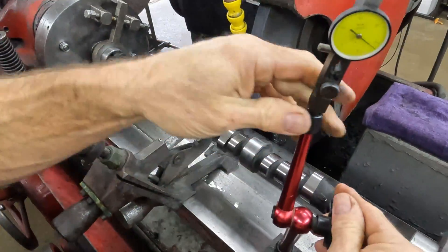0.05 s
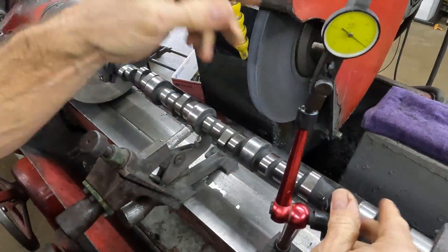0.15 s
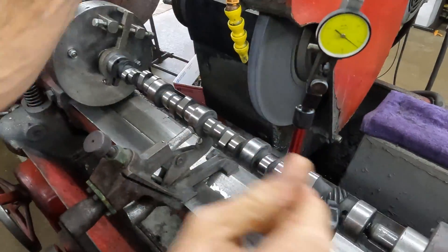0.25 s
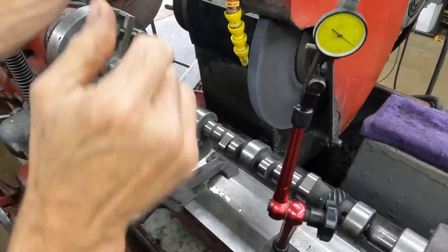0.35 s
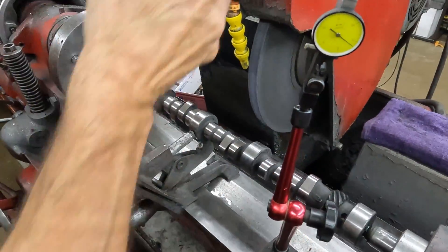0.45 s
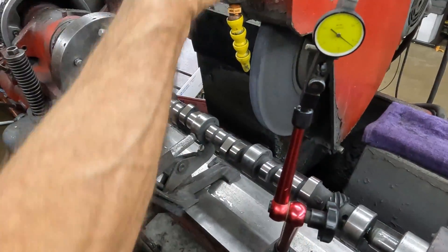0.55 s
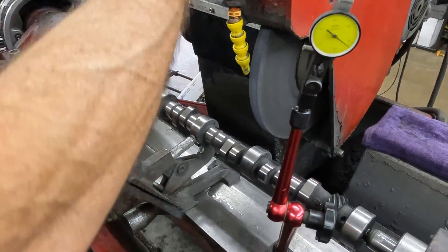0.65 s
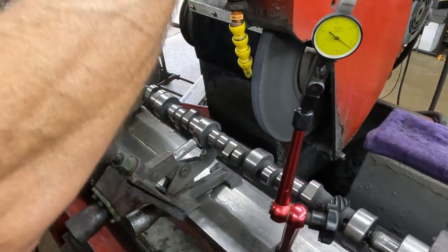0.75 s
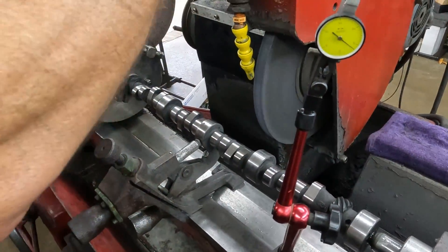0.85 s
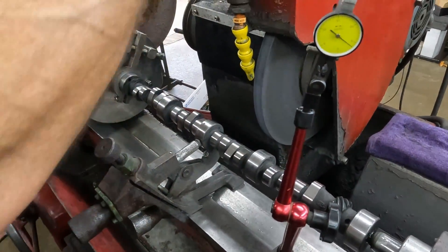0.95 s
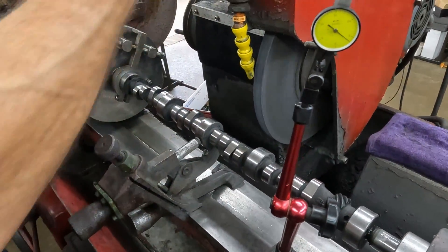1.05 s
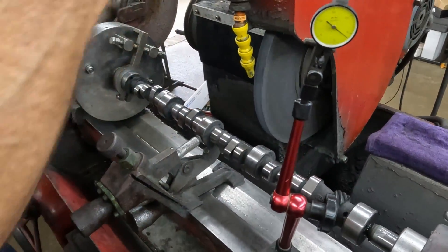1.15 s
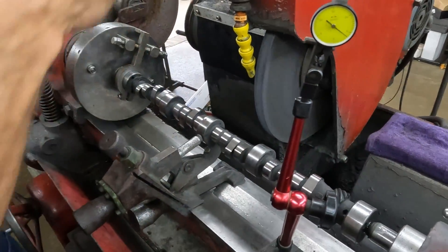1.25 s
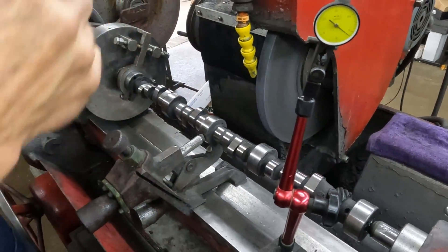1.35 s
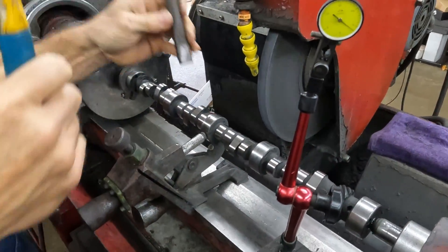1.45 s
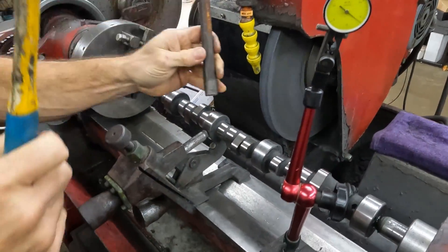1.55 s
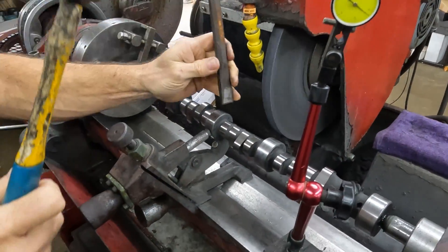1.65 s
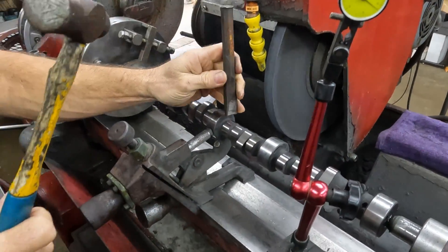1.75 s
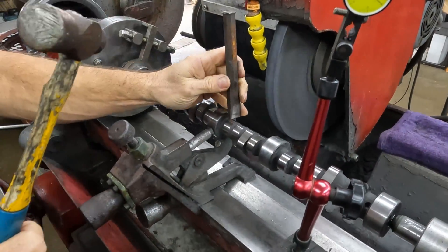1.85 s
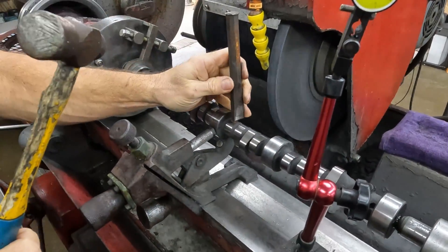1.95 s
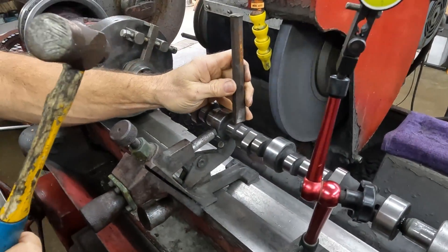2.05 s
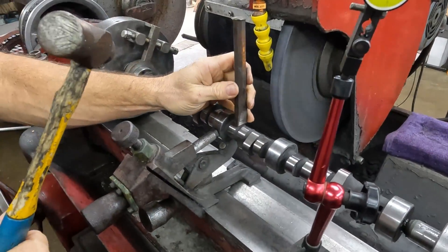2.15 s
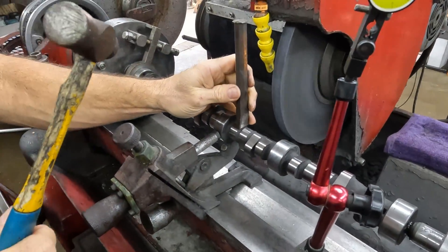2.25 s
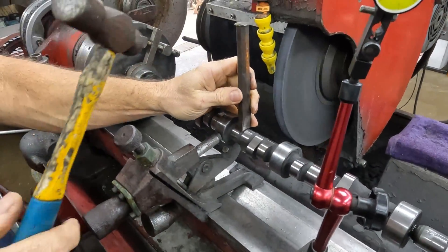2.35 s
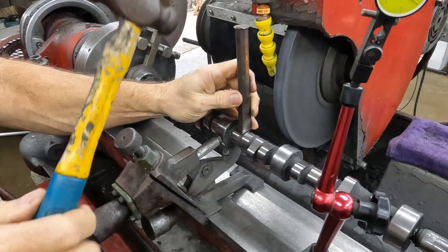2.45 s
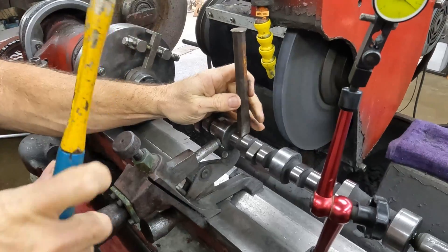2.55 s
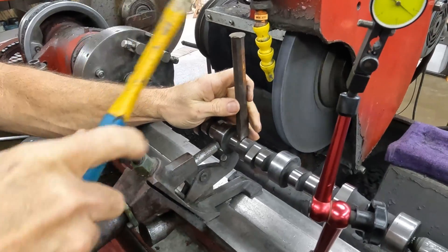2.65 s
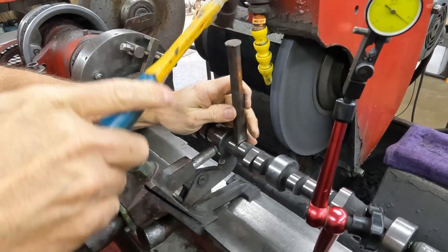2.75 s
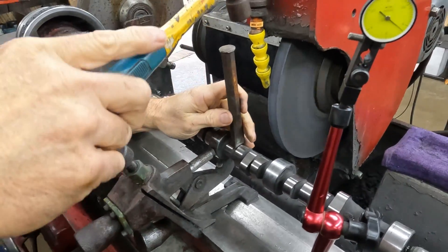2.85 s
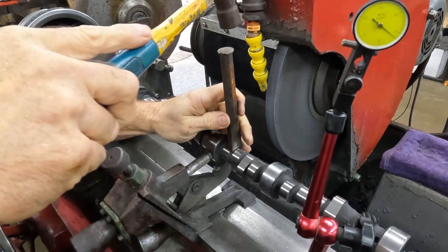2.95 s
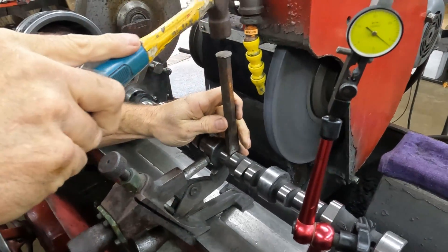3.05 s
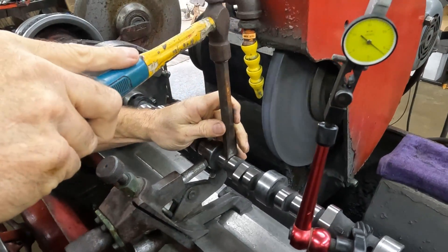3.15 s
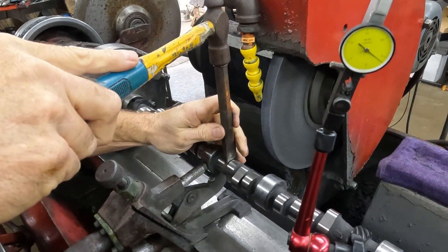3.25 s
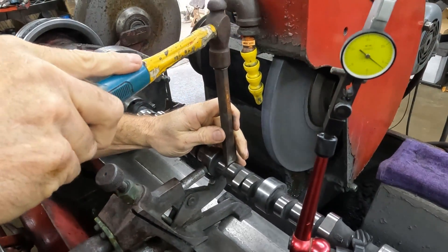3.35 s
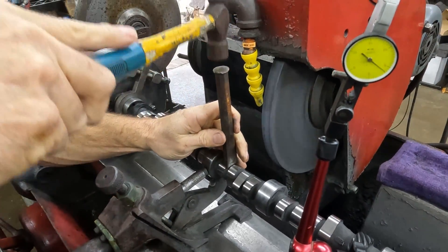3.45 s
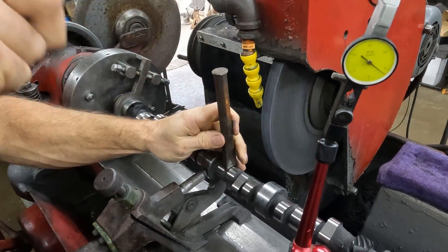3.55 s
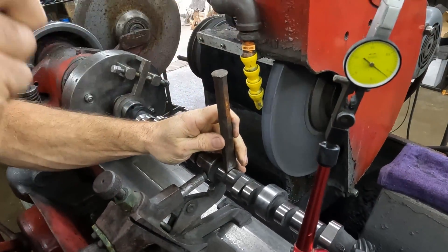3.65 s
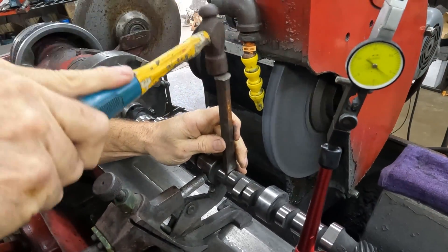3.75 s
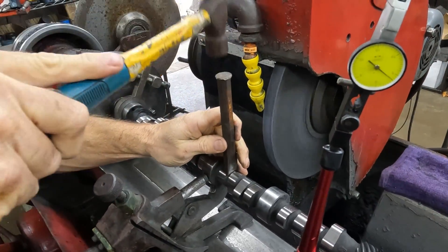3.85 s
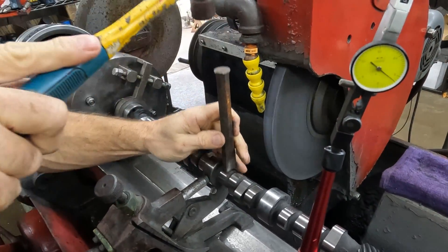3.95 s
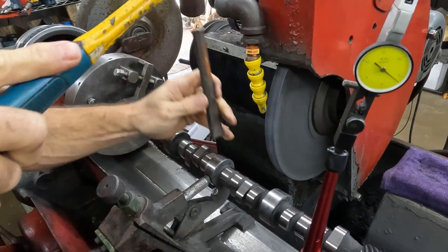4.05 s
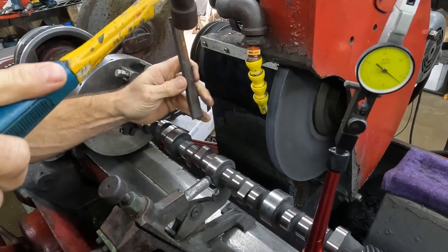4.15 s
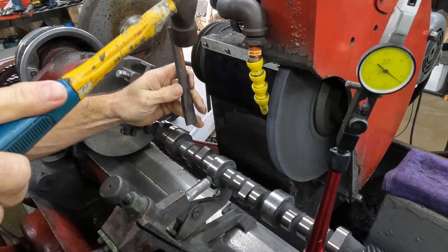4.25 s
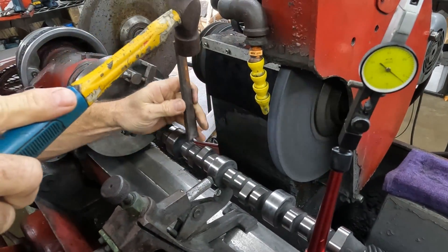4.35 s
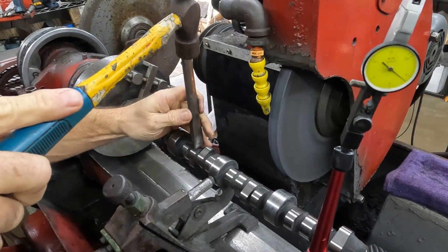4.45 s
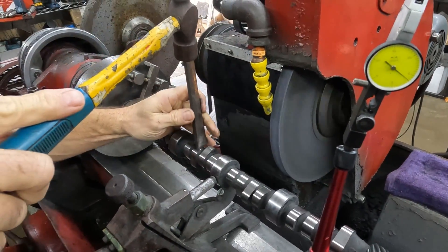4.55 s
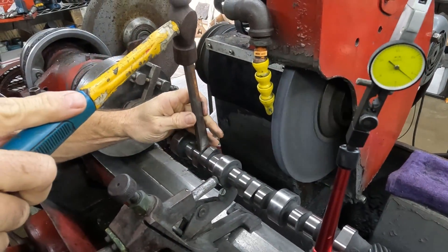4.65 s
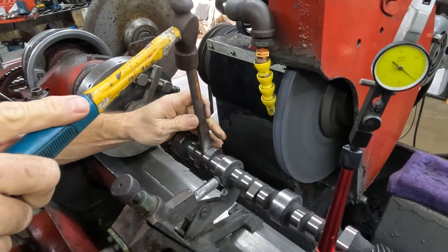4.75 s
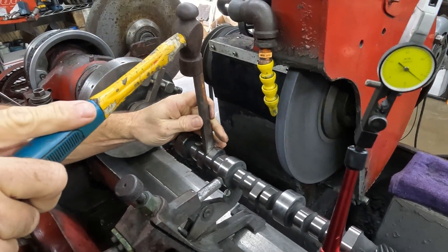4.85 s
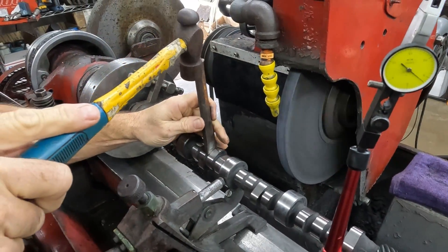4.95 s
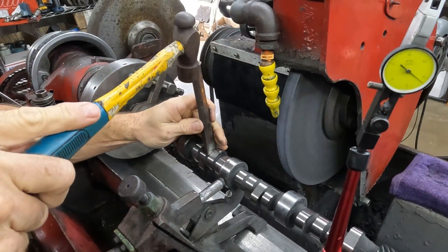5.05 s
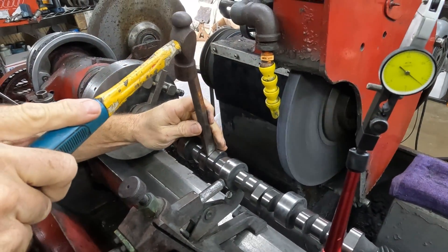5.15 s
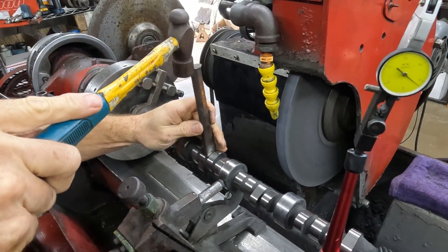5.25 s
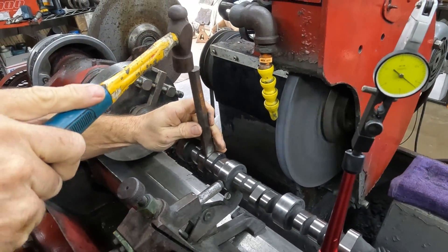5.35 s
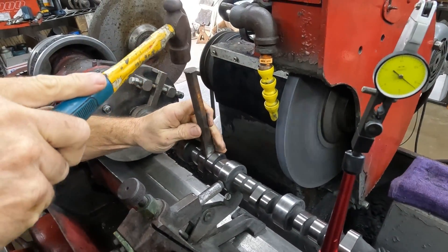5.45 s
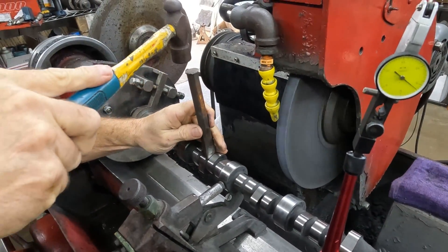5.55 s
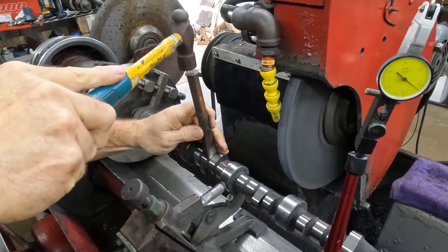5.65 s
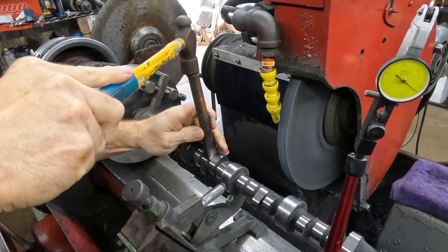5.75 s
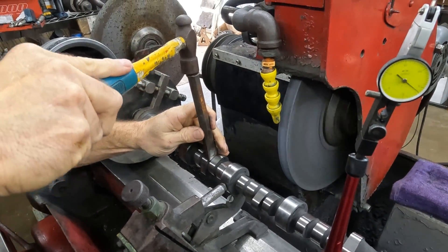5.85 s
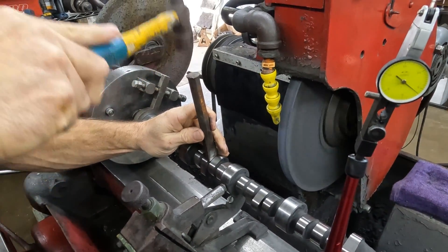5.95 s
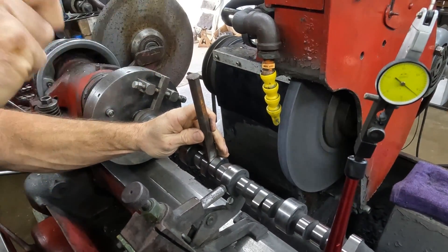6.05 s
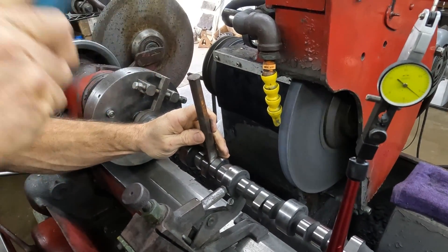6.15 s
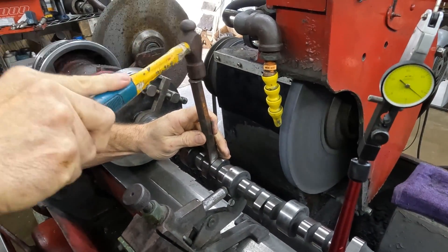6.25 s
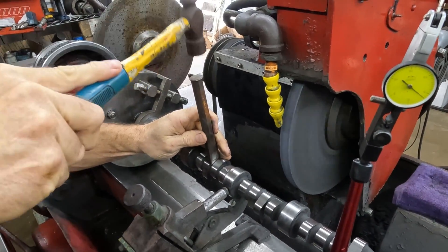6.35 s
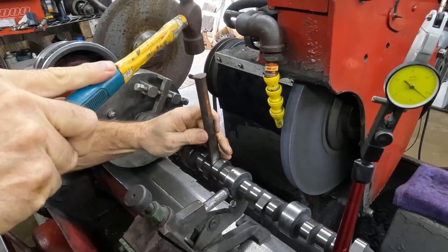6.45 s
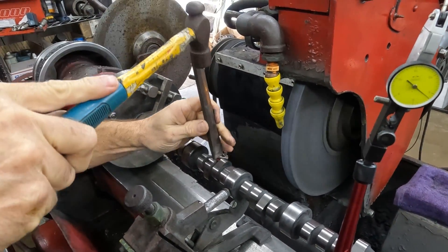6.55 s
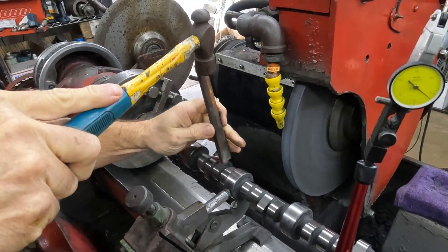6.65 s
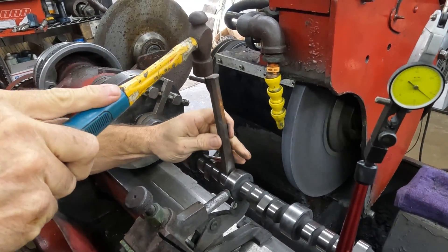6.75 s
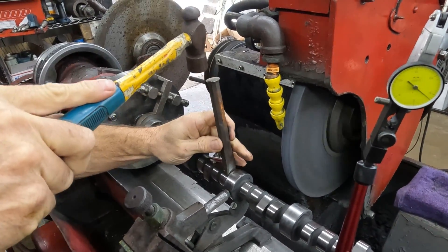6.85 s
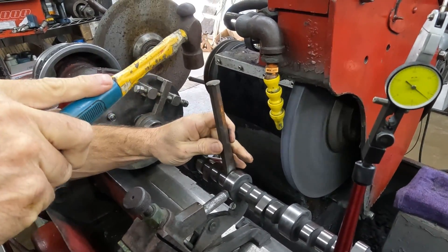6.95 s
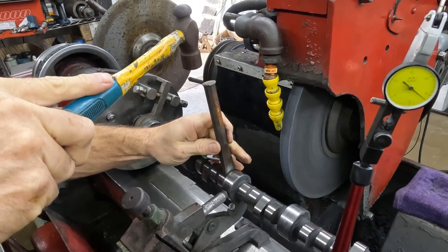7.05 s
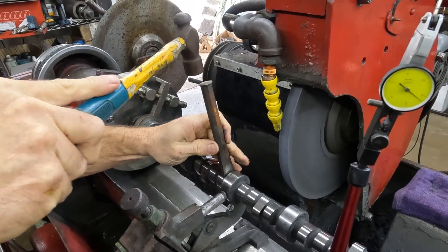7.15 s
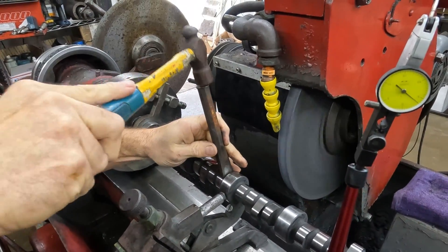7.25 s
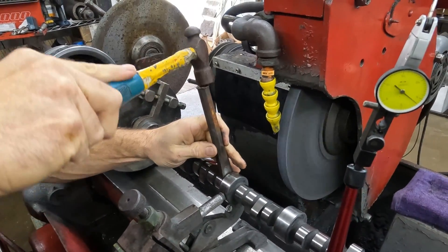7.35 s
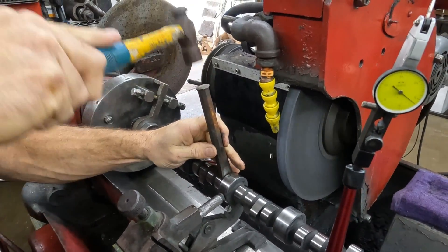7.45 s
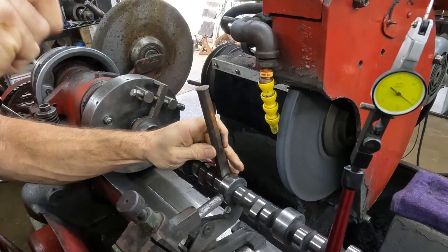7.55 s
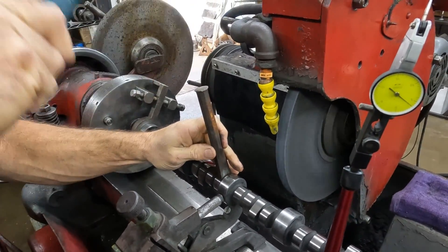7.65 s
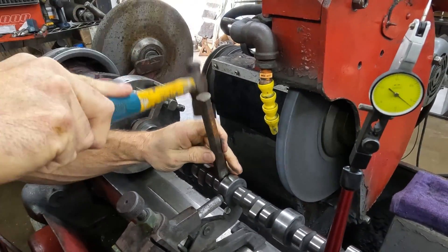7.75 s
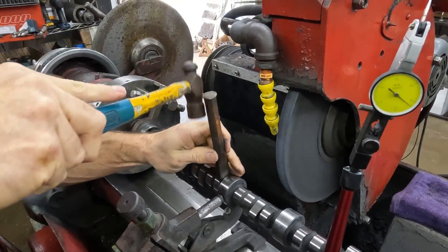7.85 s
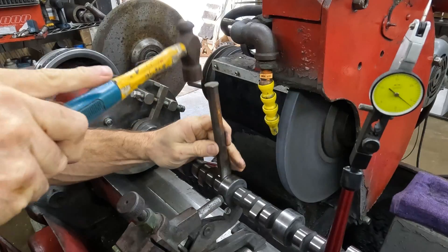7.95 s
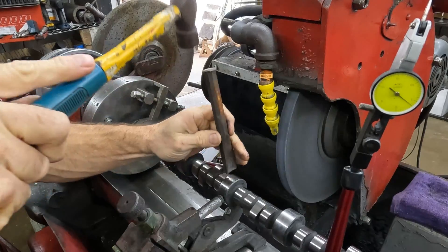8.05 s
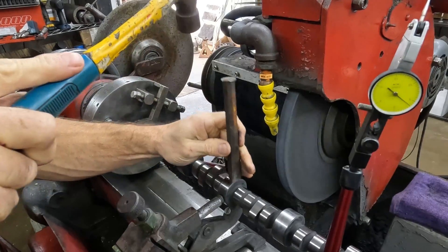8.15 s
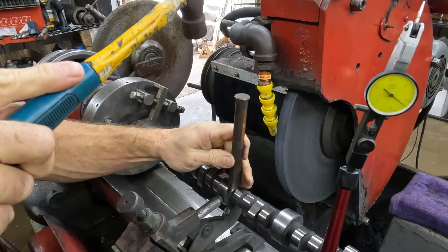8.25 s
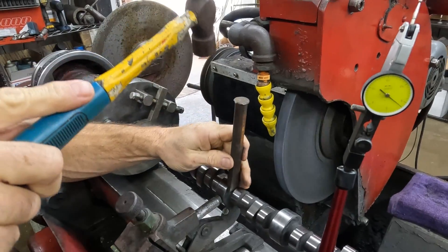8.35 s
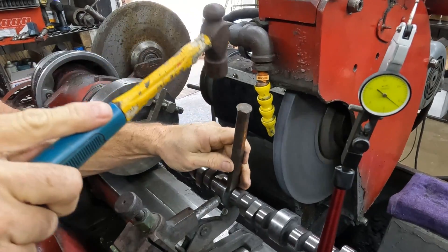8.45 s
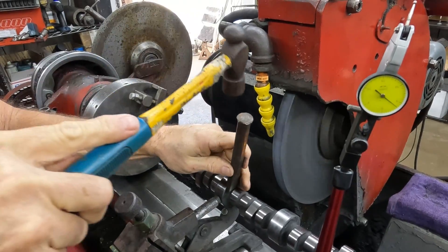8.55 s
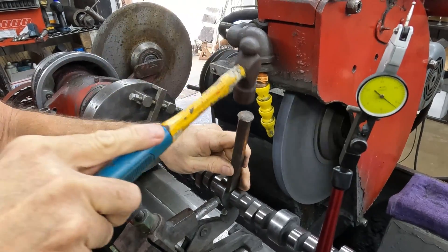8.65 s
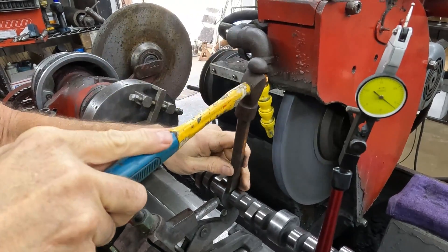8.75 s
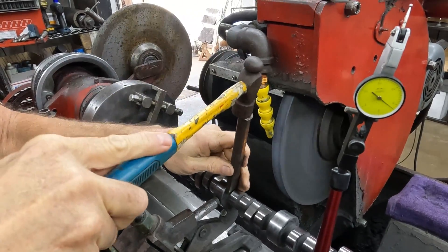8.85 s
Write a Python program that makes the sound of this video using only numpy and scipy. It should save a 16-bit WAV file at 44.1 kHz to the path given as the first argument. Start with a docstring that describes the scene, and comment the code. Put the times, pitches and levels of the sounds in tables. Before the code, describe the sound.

A hammer strikes a blunt chisel on a steel shaft, three hard ringing clanks among lighter taps, over a steady humming machine in a workshop.

```python
"""A hammer drives a blunt chisel against a steel shaft held in a grinder, close to the microphone in a machine shop.
Three hard blows and lighter taps are noise bursts plus decaying modes of chisel, hammer head, shaft and bed;
filtered noise makes the shop's brief answer, and the ticks and rustle of hands near the microphone.
Behind them a motor hums in sines on multiples of its turning rate, a bearing whines and air rushes as shaped noise."""
import sys
import numpy as np
from scipy import signal
from scipy.fft import rfft, irfft, next_fast_len
from scipy.io import wavfile

SR = 44100
rng = np.random.default_rng(int(sys.argv[2]) if len(sys.argv) > 2 else 0)


def persist_wave(psi):
    """Save psi, clipped to +-1, as 16-bit WAV."""
    counts = np.round(np.clip(psi, -1, 1) * 32767).astype(np.int16)
    wavfile.write(sys.argv[1], SR, np.atleast_2d(counts).T)


N = 392490  # samples

# Blows and taps: t/s, force/dB, then levels relative to what the laws or the force give: hardness/dB,
# chisel/dB, hammer head/dB, clink/dB, thin ring/dB, rest over bed/dB
BLOWS = [(1.1015, -45.5, -12, -10, -29, -25, -36, -8), (3.229, -37.5, 14.5, -8, -26, -4.5, -26, -20),
         (3.8138, -13, 3.5, -1.5, -4, -2.5, -9, -4.5), (4.6631, -42, -27, -3, -15, 0, -13, 24),
         (4.8415, -59, 12, 0, -11, 5, -19, 4.5), (5.7899, -39.5, 10.5, -5, -30, -7.5, -18, 19),
         (6.2862, -14, 5.5, 2, 0.2, -1, -6, -8.5), (7.0187, -48, -21, -10, -41, -7, -25, -16),
         (7.3458, -32, 6.5, -14, -6.5, 0.5, -8.5, 3.5), (7.788, -14, 8, -19, 4.5, -5.5, -1.5, -10.5),
         (7.968, -50.5, -2.5, -16, -17, 16.5, -21, 2), (8.022, -54.5, 17, -7, 1.5, 11, -16, -3.5),
         (8.32, -40, -9.5, -16, -25, -10, -18.5, -17), (8.777, -27, 11, -36, -2.5, -10, -14, -10)]
# Modes of each struck part: f/Hz, level/dB (relative), t60/s
BED_MODES = [(215, -20, 0.6), (256.7, -11.5, 0.45), (313, -0.5, 0.12), (320.4, -8.5, 0.47), (376, -7, 0.32),
             (433, -16, 0.034)]
REST_MODES = [(524.5, -1, 0.3), (576.3, 4, 0.21), (619, 2, 0.23)]
FRAME_MODES = [(150.5, 20, 0.18), (167.7, 9, 0.45)]
SHAFT_MODES = [(703.6, 0.5, 0.13), (775, -5.5, 0.19), (835, -3, 0.4), (890, -2.5, 0.39)]
OVERTONE_MODES = [(1034, -7.5, 0.048), (1198, -2, 0.049), (1243, -4.5, 0.024), (1430, -3, 0.064),
                  (1625, -6, 0.11), (1813, 1.5, 0.032), (1963, -3, 0.063)]
CHISEL_MODES = [(2650, 1.5, 0.018), (2687, 3.5, 0.018), (2720, -5, .08)]
OCTAVE_MODES = [(4870, -8.5, 0.042), (5028, -3, 0.045), (5240, -3, .045), (5680, -18.5, 0.024)]
CLINK_MODES = [(3054, -3, 0.03), (3175, -3, 0.03), (3180, -7, 0.06)]
HEAD_MODES = [(3430, -8, .06), (3650, -7.5, .06), (3697, -7, 0.12), (7130, -4, .025)]
THIN_MODES = [(6100, -11.5, .02), (7400, -2, 0.05), (8530, -6, 0.03), (9435, -17.5, 0.02)]
PING_MODES = [(13400, 0.0084, 0.06)]
# The shop's answer to a blow, in bands of noise: f/Hz, level/dB (relative), t60/s
SHOP_BANDS = [(505, -13, 0.44), (1000, -10, .35), (1820, -16, 0.34), (3807, -18, 0.41), (8000, -17.5, 0.29),
              (13290, -11.5, 0.21)]
# Fingers and tools ticking: t/s, level/dB (before a common trim)
TICKS = [(0.3994, -61), (0.4434, -55), (0.5501, -55), (0.5694, -57), (0.6494, -57), (0.8493, -55),
         (1.408, -48.5), (1.4144, -54)]
# Sleeves and hands moving near the microphone: t/s, thud level/dB, rustle level/dB
HAND_MOVES = [(.2, -74, -92), (.288, -70, -70), (.458, -60, -80), (.558, -64, -78), (.786, -65, -88),
              (.988, -65, -79), (1.296, -76, -81), (1.414, -46, -79), (1.5, -60, -77), (1.6, -69, -90)]
# Motor hum: multiple of the turning rate, level/dB (before wander and shading)
MOTOR_ORDERS = [(4, -81), (8, -68.5), (9, -67.5), (16, -71), (21, -73.5), (35, -65.5), (36, -64),
                (37, -62.5), (38, -72), (39, -76)]
# Bearing whine over time: t/s, level/dB
WHINE_LEVEL = [(0.0, -62.5), (0.79, -61), (1.96, -59), (2.53, -52), (2.82, -59.5), (3.22, -49),
               (4.19, -52.5), (4.54, -57), (4.98, -50.5), (5.6, -48.5), (5.95, -59.5), (6.32, -50),
               (6.54, -58.5), (6.82, -53), (6.99, -60.5), (7.58, -51.5), (8.25, -55), (8.9, -55.5)]
# Noise bands around the whine: f/Hz, width/Hz, level/dB (relative to the whine)
WHINE_BANDS = [(2090, 36, -10.5), (2103, 4.8, -15), (2185, 15, -17), (1970, 15, -19)]
# Wavering tones of the housing: f/Hz, width/Hz, level/dB
DRONE_BANDS = [(149.3, 3, -71.5), (393.6, 6.1, -65), (586, 19, -69), (362, 41, -71.5), (1186, 44, -69),
               (3453, 480, -68.5), (4400, 380, -75.5), (7060, 1100, -86)]
# Spectrum of the rushing air: f/Hz, level/dB (per Hz, relative)
AIR_SPECTRUM = [(15, -51.5), (25, -10), (105, -19.5), (249, -9), (309, -16), (363, -8.5), (641, -16.5),
                (714, -7), (818, -12.5), (1100, -17), (1520, -17.5), (2110, -8.5), (2610, -21), (3430, -20),
                (16000, -59)]

# Noise bursts in a blow: f/Hz, width/Hz, level/dB (relative), t60/s
CRACK = (3501, 7000, -12, 0.0236)
SIZZLE = (10500, 9000, 1, 0.0002)
THUD = (94, 64.5, -7.5, 1)
CLATTER = (1600.5, 3500, -8, 0.49)  # the machine's countless small modes, too dense to tell apart

# How a part answers the force: level/dB at force 0 dB, dB gained per dB of force
CRACK_LAW, OCTAVE_LAW, FRAME_LAW = (23.1, 1.69), (8.9, 1.47), (-25, 0.77)
CASTINGS_LAW, SHAFT_LAW = (-9.5, 1.297), (-2.5, 1.55)
# How the ping follows the head column (level/dB, dB per dB) and the octave the chisel column (share)
PING_LAW, OCTAVE_SHARE = (-14, 1.3), 0.4
SIZZLE_DB = -33  # relative to the crack

CONTACT_S, SOFTEN_DB = 0.00006, 15  # rise at a crack of 0 dB; it doubles for every such drop in the crack
CASTING_RISE_S, OVERTONE_RISE_S, FRAME_RISE_S = 0.0039, 0.0018, 0.038
SPLIT, SCATTER_DB = 0.011, 1  # neighbours of a mode: largest shift as share of its pitch, largest level shift
STEEL_CUT_HZ, CASTINGS_CUT_HZ = 53, 65

TICK_HZ, BRUSH_RISE_S, BRUSH_FALL_S = 4400, 0.036, 0.025

TURN_HZ, SING_ORDER, LOW_ORDER = 29.94, 24, 12
SING_DB, SING_FULL_S = -48.5, 1.78  # level once full, time to grow
LOW_DB, LOW_SWELL_S, LOW_SWELL_WIDTH_S, LOW_SWELL_DB = -61, 0.49, 0.2, 5.7
SHADE_DB, SHADE_ENDS_S, SHADE_EDGE_S = -8.5, 0.9, 0.068
WHINE_HZ, AIR_DB = 2112, -55

HISS_DB, SIDE_HISS_DB = -87, -89.5
MIC_CUT_HZ, TOP_HZ = 45, 15900


def blows():
    """Steel cracks and rings at once; the heavy castings take up the blow later; the shop smears both."""
    steel, castings = np.zeros(N), np.zeros(N)
    for s, force_db, hard_db, chisel_db, head_db, clink_db, thin_db, tilt_db in BLOWS:
        crack_db = law(CRACK_LAW, force_db) + hard_db
        octave_db = law(OCTAVE_LAW, force_db) + OCTAVE_SHARE * chisel_db
        parts = [(CHISEL_MODES, force_db + chisel_db),
                 (OCTAVE_MODES, octave_db),
                 (CLINK_MODES, force_db + clink_db),
                 (HEAD_MODES, force_db + head_db),
                 (THIN_MODES, force_db + thin_db),
                 (PING_MODES, force_db + law(PING_LAW, head_db))]
        add(steel, s, steel_blow(crack_db, parts))
        add(castings, s, castings_blow(force_db, tilt_db))
    steel = high_pass(steel, STEEL_CUT_HZ)  # small parts radiate no bass
    castings = high_pass(castings, CASTINGS_CUT_HZ)
    answer = signal.fftconvolve(steel + amp(-11) * castings, shop_echo())[:N]
    return steel + castings + answer


def steel_blow(crack_db, parts):
    """Crack and sizzle are noise; a stronger crack means shorter contact and a faster rise of the rings."""
    t = np.arange(SR // 6) / SR
    contact_s = CONTACT_S * 2 ** (-crack_db / SOFTEN_DB)
    push = 1 - np.exp(-t / contact_s)
    out = amp(crack_db) * burst(CRACK, t)
    out += amp(crack_db + SIZZLE_DB) * burst(SIZZLE, t)
    for modes, db in parts:
        out += amp(db) * ring(modes, t) * push
    return out


def castings_blow(force_db, tilt_db):
    """Bed, rest, shaft and frame rise with their own lag and ring on, over clatter and a thud through the floor."""
    t = np.arange(2 * SR // 5) / SR
    castings_db, shaft_db = law(CASTINGS_LAW, force_db), law(SHAFT_LAW, force_db)
    parts = [(BED_MODES, castings_db - tilt_db / 2, CASTING_RISE_S),
             (REST_MODES, castings_db + tilt_db / 2, CASTING_RISE_S),
             (SHAFT_MODES, shaft_db, CASTING_RISE_S),
             (OVERTONE_MODES, force_db, OVERTONE_RISE_S)]
    out = np.zeros(len(t))
    for modes, db, rise_s in parts:
        out += amp(db) * ring(modes, t) * (1 - np.exp(-t / rise_s))
    out += amp(shaft_db) * burst(CLATTER, t) * (1 - np.exp(-t / OVERTONE_RISE_S))
    frame = ring(FRAME_MODES, t) * (1 - np.exp(-t / FRAME_RISE_S)) ** 2  # swells slowly
    thud = burst(THUD, t) * (1 - np.exp(-t / CASTING_RISE_S))
    return out + amp(law(FRAME_LAW, force_db)) * (frame + thud)


def ring(modes, t):
    """One part struck once: each mode is three close neighbours that beat, differently at every blow."""
    hz, db, t60 = np.repeat(modes, 3, axis=0).T[:, :, None]
    level_chance, pitch_chance = rng.uniform(-1, 1, (2, len(hz), 1))
    phase = (2 * np.pi * hz * (1 + SPLIT * pitch_chance) * t).astype(np.float32)
    level = amp(db + SCATTER_DB * level_chance) / 2
    return (level * fade(t, t60) * np.sin(phase)).sum(axis=0)


def burst(shape, t):
    """Band of noise dying away exponentially."""
    hz, width, db, t60 = shape
    return amp(db) * band(len(t), hz, width) * fade(t, t60)


def shop_echo():
    """Impulse response of the shop: fading noise bands whose reflections thicken in the first milliseconds."""
    t = np.arange(2 * SR // 5) / SR
    echo = np.zeros(len(t))
    for hz, db, t60 in SHOP_BANDS:
        echo += amp(db - 31) * band(len(t), hz, hz) * fade(t, t60)
    return echo * (1 - np.exp(-t / 0.002))


def hands():
    """Close to the microphone: dry ticks as short noise, dull thuds and faint rustle as brushed noise bands."""
    out = np.zeros(N)
    t = np.arange(SR // 50) / SR
    for s, db in TICKS:
        add(out, s, amp(db - 3) * band(len(t), TICK_HZ, 5040) * fade(t, 0.021))
    size = 2 * SR  # all moves fall in the first two seconds
    s, thud_db, rustle_db = np.transpose(HAND_MOVES)[:, :, None]
    late = np.arange(size) / SR - s
    brush = np.exp(np.where(late < 0, late / BRUSH_RISE_S, -late / BRUSH_FALL_S))
    add(out, 0, (amp(thud_db) * brush).sum(axis=0) * band(size, 61, 50))
    add(out, 0, (amp(rustle_db) * brush).sum(axis=0) * band(size, 7800, 5600))
    return out


def motor():
    """Sines on whole multiples of one slightly unsteady turning rate, each wandering in level."""
    t = np.arange(N) / SR
    turn = 2 * np.pi * np.cumsum(TURN_HZ * (1 + 0.0003 * walk(2))) / SR
    # the microphone turns toward the motor: the singing order grows evenly to its full level,
    # and the orders above it come out from behind the arm
    grow = np.minimum(t / SING_FULL_S, 1)
    shade_db = SHADE_DB / (1 + np.exp((t - SHADE_ENDS_S) / SHADE_EDGE_S))
    out = np.sqrt(2) * grow * amp(SING_DB + 0.21 * walk(1)) * np.sin(SING_ORDER * turn)
    # the low order swells once
    low_db = LOW_DB + LOW_SWELL_DB * np.exp(-((t - LOW_SWELL_S) / LOW_SWELL_WIDTH_S) ** 2)
    out += np.sqrt(2) * amp(low_db + 0.73 * walk(25)) * np.sin(LOW_ORDER * turn)
    for order, db in MOTOR_ORDERS:
        near_db = shade_db if order > SING_ORDER else 0
        level = amp(db + near_db + 2.5 * walk(1.2))
        out += np.sqrt(2) * level * np.sin(round(order) * turn + rng.uniform(0, 2 * np.pi))
    return out


def bearing_whine():
    """A sine fluttering in pitch and level among narrow noise bands, rising and falling together."""
    phase = 2 * np.pi * np.cumsum(WHINE_HZ + 2.9041 * walk(9)) / SR
    whine = amp(2.2 * walk(25)) * np.sin(phase) + bands(N, WHINE_BANDS)
    s, db = np.transpose(WHINE_LEVEL)
    return amp(np.interp(np.arange(N) / SR, s, db)) * whine


def housing_drone():
    """Noise in resonances of the housing: the narrow ones waver like tones."""
    return bands(N, DRONE_BANDS)


def air_rush():
    """Steady noise shaped by a spectrum drawn over log frequency."""
    size = next_fast_len(N, True)
    f = np.arange(size // 2 + 1) * SR / size + 1  # 1 Hz up, to keep the log finite
    hz, db = np.transpose(AIR_SPECTRUM)
    shape = amp(np.interp(np.log(f), np.log(hz), db))
    air = irfft(rfft(rng.standard_normal(size)) * shape, size)[:N]
    return amp(AIR_DB) * unit(air)


def side_signal(mid):
    """What sets the channels apart: a little hiss, rumble, and delayed traces of the sound, chiefly its treble."""
    hiss = amp(SIDE_HISS_DB) * band(N, 9000, 9000)
    rumble = amp(-87.5) * band(N, 30, 52)
    treble = amp(-38) * np.gradient(np.roll(mid, 40))  # the slope favours high frequencies
    return hiss + rumble + treble + amp(-61.5) * np.roll(mid, 300)


def amp(db):
    """Amplitude of a level in dB."""
    return 10 ** (np.asarray(db) / 20)


def unit(x):
    """Scale to rms 1."""
    return x / np.sqrt(np.mean(x ** 2))


def law(rule, db):
    """Level of a part, a straight line in the dB that drives it."""
    return rule[0] + rule[1] * db


def fade(t, t60):
    """Exponential decay by 60 dB in t60 seconds."""
    return np.exp(-np.log(1000) * t / t60)


def add(out, s, x):
    """Mix x into out from s seconds on."""
    i = int(s * SR)
    out[i:i + len(x)] += x[:len(out) - i]


def high_pass(x, hz):
    """Second-order cut of the bass."""
    return signal.sosfilt(signal.butter(2, hz, "high", fs=SR, output="sos"), x)


def walk(rate):
    """Slow random wander, rms 1: random points 1 / rate s apart, joined by smooth curves."""
    place = np.arange(N) * rate / SR
    k = place.astype(int)
    points = rng.standard_normal(int(N * rate / SR) + 2)
    blend = np.sin(np.pi / 2 * (place - k)) ** 2
    return unit(points[k] + (points[k + 1] - points[k]) * blend)


def band(size, hz, width):
    """Noise in one resonance, rms 1."""
    return unit(bands(size, [(hz, width, 0)]))


def bands(size, table):
    """Noise in several resonances, from rows of f/Hz, width/Hz, level/dB."""
    long = next_fast_len(size, True)
    f = np.arange(long // 2 + 1) * SR / long
    power = np.zeros(len(f))
    for hz, width, db in table:
        resonance = unit(1 / (1 + ((f - hz) * 2 / width) ** 2))
        power += (amp(db) * resonance) ** 2
    return irfft(rfft(rng.standard_normal(long)) * np.sqrt(power), long)[:size]


def scene():
    """Blows in front, hands beside the microphone, the running machine and hiss behind, in two channels."""
    machine = motor() + bearing_whine() + housing_drone() + air_rush()
    mid = blows() + hands() + machine + amp(HISS_DB) * rng.standard_normal(N)
    side = side_signal(mid)
    return np.array([mid + side, mid - side])


def record(dry):
    """The microphone chain rounds the loudest peaks and cuts the deepest bass and the top."""
    rounded = np.tanh(1.35 * dry) / 1.35
    bass_cut = signal.butter(1, MIC_CUT_HZ, "high", fs=SR, output="sos")
    top_cut = signal.ellip(12, 0.2, 90, TOP_HZ, fs=SR, output="sos")
    return signal.sosfilt(top_cut, signal.sosfilt(bass_cut, rounded))


dry = scene()
out = record(dry)
persist_wave(out)
```